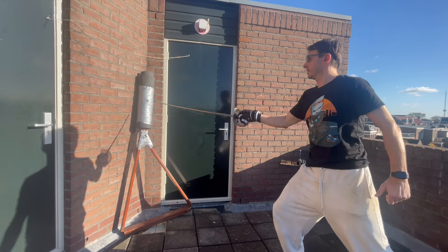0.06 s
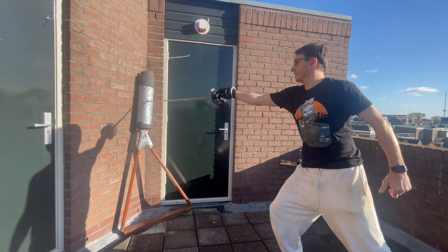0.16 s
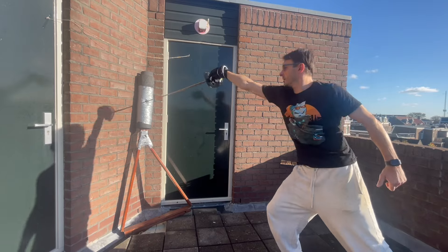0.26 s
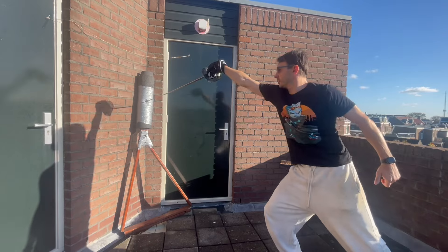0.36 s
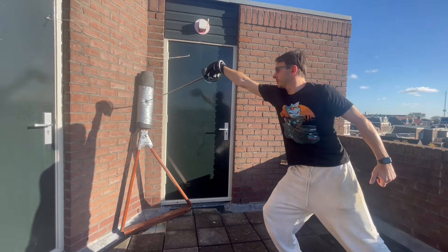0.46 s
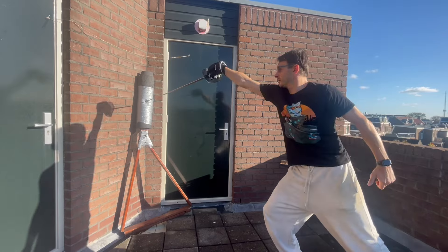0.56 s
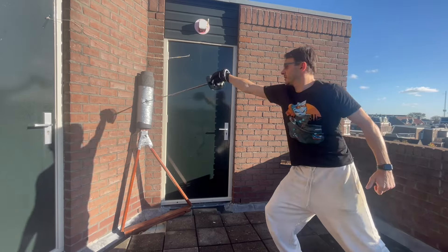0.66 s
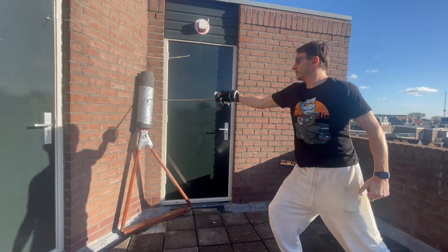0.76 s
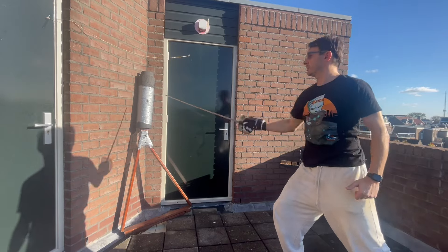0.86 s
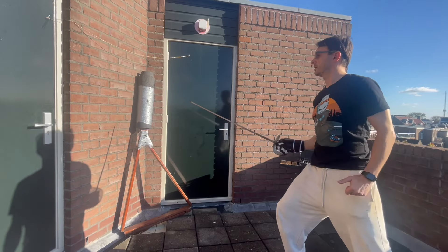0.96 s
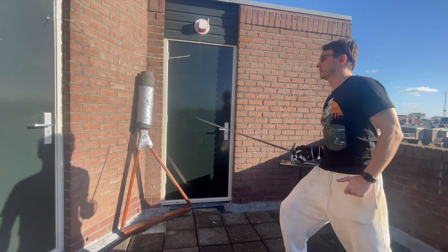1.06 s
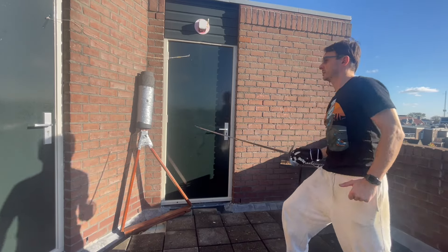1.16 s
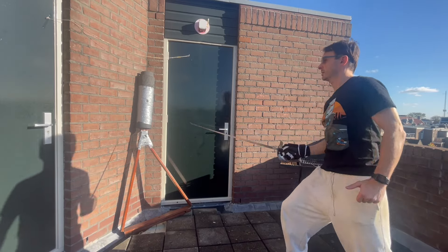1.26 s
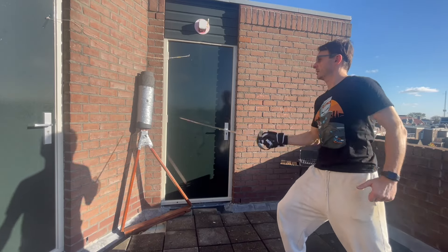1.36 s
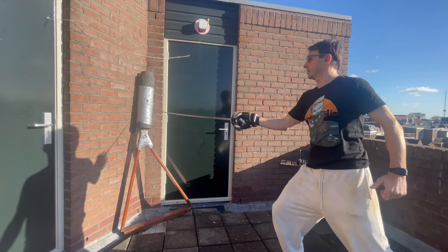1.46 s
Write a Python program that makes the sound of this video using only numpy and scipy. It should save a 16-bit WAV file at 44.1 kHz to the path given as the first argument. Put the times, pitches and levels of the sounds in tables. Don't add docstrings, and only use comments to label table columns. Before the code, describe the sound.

A single blade thrust hits a taped padded tube with a sharp crack, crunch and dull thud, its wooden stand rattling briefly; close stereo microphone on a brick roof terrace, low city hum, then a faint shoe scrape.

```python
import sys
import numpy as np
from scipy import signal
from scipy.fft import rfft, irfft, next_fast_len
from scipy.io import wavfile
from scipy.ndimage import uniform_filter1d, map_coordinates

SR = 44100
rng = np.random.default_rng(int(sys.argv[2]) if len(sys.argv) > 2 else 0)


def dump(signal):
    limited = np.clip(np.atleast_2d(signal).T, -1, 1)
    pcm = np.round(limited * 32767).astype(np.int16)
    wavfile.write(sys.argv[1], SR, pcm)


def rack_gain(trim_db):
    fader = np.asarray(trim_db, float)
    return 10 ** (fader / 20)


N = 66150


def unit(x):
    return x / np.sqrt(np.mean(x ** 2) + 1e-20)


def along(points, hz):
    f, value = np.transpose(points)
    return np.interp(np.log(hz + 1), np.log(f + 1), value)


def level(rows):
    s, db = np.transpose(rows)
    return rack_gain(np.interp(np.arange(N) / SR, s, db, left=-130, right=-130))


def burst(s, db, t60):
    t = np.arange(N) / SR
    return (t >= s) * rack_gain(db - 60 * np.clip(t - s, 0, 1) / t60)


def wobble(rate):
    knots = rng.standard_normal(int(N * rate / SR) + 4)
    return map_coordinates(knots, [np.arange(N) * rate / SR])


def filtered(x, response):
    m = next_fast_len(N + SR // 2)
    return irfft(rfft(x, m) * response(np.fft.rfftfreq(m, 1 / SR)), m)[..., :N]


def without_bass(x, low_hz):
    return filtered(x, lambda hz: (1j * hz / (low_hz + 1j * hz)) ** 2)


def coloured(x, spectrum):
    closed = [(spectrum[0][0] / 2, -70)] + list(spectrum) + [(spectrum[-1][0] * 2, -90)]
    return unit(filtered(x, lambda hz: rack_gain(along(closed, hz))))


# f/Hz, likeness [0..1]
PORT_LIKENESS = [(100, 0.93), (250, 0.51), (420, 0.27), (600, 0.88), (1100, 0.039), (8000, 0.033),
                 (9500, 0.55), (12500, 0.52)]


def far(spectrum):
    def shares(hz):
        turn = np.arccos(np.clip(along(PORT_LIKENESS, hz), 0, 1)) / 2
        return np.array([np.cos(turn), np.sin(turn)])

    mid, side = filtered(rng.standard_normal((2, N)), shares)
    return coloured(np.array([mid + side, mid - side]), spectrum)


def ring(events, modes, attack_s, scatter_db, turn):
    t, out = np.arange(N) / SR, np.zeros((2, N))
    hz, db, t60 = np.transpose(modes)[:, :, None]
    chance = rng.standard_normal((len(events), 2, 2, len(modes), 1))
    for (s, size_db), (luck, phase) in zip(events, chance):
        start = int(s * SR) + 1
        u = t[start:start + SR // 6] - s
        strength = rack_gain(size_db + db + scatter_db * luck - 60 * u / t60)
        tones = strength * np.sin(2 * np.pi * hz * u + turn * phase)
        out[:, start:start + len(u)] += tones.sum(1) * (1 - np.exp(-u / attack_s)) ** 2
    return out


# f/Hz, level/dB
RUMBLE = [(25, -18.5), (55, 2.5), (100, -5), (200, -11.5), (420, -19.5), (900, -19), (1700, -28),
          (3300, -49)]
# f/Hz, level/dB
HISS = [(2000, -1.5), (3800, 3.5), (5500, 0.5), (6500, -2), (8200, 5.5), (9900, -3), (12800, -23),
        (14800, -39)]


def city():
    rumble = rack_gain(-50 + .4 * wobble(3) + .4 * wobble(12)) * far(RUMBLE)
    return rumble + rack_gain(-83) * far(HISS)


# t/s, level/dB
HUM = [
    (0, -55.5),
    (.3, -52.5),
    (.42, -65),
    (.52, -51.5),
    (.8, -53.5),
    (1.05, -57),
    (1.19, -47),
    (1.5, -51.5),
]
# t/s, level/dB
DRONE = [
    (0, -65.5),
    (.15, -57.5),
    (.35, -59),
    (.41, -51),
    (.5, -61.5),
    (.9, -61.5),
    (1.1, -65.5),
    (1.25, -61.5),
    (1.5, -54.5),
]


def engines():
    def narrow(centre_hz, width_hz):
        noise = rng.standard_normal(N)
        return unit(filtered(noise, lambda hz: 1 / (1 + ((hz - centre_hz) / width_hz) ** 2)))

    return level(HUM) * narrow(95.5, 13) + level(DRONE) * narrow(202.8, 36.4)


# f/Hz, level/dB rms
FAN = [(274, -76.5), (362, -74.5), (580, -65.5), (7762.6, -117.5), (7946.5, -79), (8038.6, -79.5),
       (8130.3, -102), (8223, -107)]


def fan():
    t, out = np.arange(N) / SR, 0
    for hz, db in FAN:
        gain = rack_gain(db + 2 + 0.14 * wobble(4.4))
        out = out + gain * np.sin(2 * np.pi * (hz * t + rng.random()))
    return out


# t/s, level/dB
CLOTH = [(0, -77), (.1, -78), (.187, -71.5), (.191, -61), (.212, -60.5), (.225, -60), (.35, -79),
         (.45, -85.5), (.8, -81), (.86, -72), (.97, -73), (1.1, -78.5), (1.25, -91), (1.5, -76.5)]
# f/Hz, level/dB
FABRIC = [(4000, -26), (6000, -2.5), (9000, -4), (12500, 1), (14500, 0.5), (15600, 12)]


def clothes():
    return level(CLOTH) * unit(far(FABRIC) * rack_gain(2.0 * wobble(170)))


# t/s, level/dB, length/s, centre f/Hz
GRIT = [(0.05, -66.5, 0.017, 3460), (0.328, -70, 0.036, 12000), (0.592, -70.5, 0.1, 11600),
        (.707, -66, 0.0094, 6000), (0.7123, -61, 0.011, 9000), (.718, -65.5, 0.093, 5200),
        (0.764, -65, 0.045, 11000), (0.766, -72, .03, 6500), (0.783, -65, 0.015, 4500),
        (.8285, -78, 0.017, 1600), (.856, -68, .02, 12000), (.882, -68, .01, 4000),
        (0.8864, -57, .03, 1990), (0.905, -71, .015, 3000), (0.908, -68, 0.011, 3500),
        (0.966, -68, .012, 4000), (0.976, -63, 0.018, 3400), (0.987, -73, .015, 3000),
        (1.035, -67.5, 0.018, 3200)]


def grit():
    sand, out = far([(500, 0), (15000, 0)]), 0
    for s, db, t60, centre_hz in GRIT:
        bell = lambda hz: np.exp(-.5 * (np.log2((hz + 1) / centre_hz) / .6) ** 2)
        out = out + burst(s, db, t60) * unit(filtered(sand, bell))
    return out


# t/s, level/dB
SWISH = [
    (.08, -83),
    (.14, -81),
    (.155, -75.5),
    (.195, -69),
    (.21, -88),
]
# f/Hz, level/dB
AIR = [(2400, -14), (3000, -5), (3450, 0), (4000, -12)]


def blade():
    return level(SWISH) * far(AIR)


# t/s, level/dB
CRUNCH = [
    (.18, -57.5),
    (.2, -48.5),
    (.204, -42),
    (.228, -38),
    (.233, -34.5),
    (.25, -36),
    (.28, -62),
    (.35, -62.5),
]
# f/Hz, level/dB
TAPE = [(300, 3.5), (1000, 0.5), (2200, -1.5), (3600, -13.5), (5500, -25), (9000, -29), (12500, -59),
        (14500, -47)]
# t/s, level/dB
KNOCKS = [(.2032, -35), (.2105, -31.5), (.2172, -35), (.2299, -24), (0.2313, -14.5), (.234, -19),
          (.2375, -34.5), (.247, -40), (.253, -30.5), (.2625, -28.5), (.269, -46), (.279, -37),
          (.29, -45.5), (.301, -58)]


def crunch():
    effort = level(CRUNCH) + sum(burst(s, db - 14, .015) for s, db in KNOCKS)
    effort = np.abs(uniform_filter1d(effort, size=60))
    noise = rng.standard_normal(N) + 0.26 * rng.standard_normal((2, N))
    return effort * coloured(noise * rack_gain(0.98 * wobble(405.2)), TAPE)


# f/Hz, level/dB, t60/s
CLACK = [(749, -2, 0.017), (1000, -4, 0.022), (1200, -18, 0.0057), (1920, -10, 0.024), (2860, -18.5, 0.024),
         (3200, -24, 0.012), (3700, -13.5, 0.012), (4870, -32, 0.018), (6060, -44, 0.011)]
# f/Hz, level/dB, t60/s
STAND = [(818, -4.5, 0.21), (1025, 2, 0.078), (1177, -2, 0.14), (1336, -0.5, 0.18), (1552, -2.5, 0.15),
         (1766, -9, 0.3), (1961, 3, 0.17), (2127, 3, 0.11), (2240, -8, 0.078), (2460, -5, 0.17),
         (3200, -16, 0.065), (3600, -26, 0.12)]


def knocks():
    clack = ring(KNOCKS, CLACK, attack_s=.00025, scatter_db=2, turn=.3)
    damped = np.array(STAND) * [1, 1, .5]
    return clack + rack_gain(-17) * ring(KNOCKS, damped, attack_s=0.00042, scatter_db=4.0, turn=0.43)


# t/s, level/dB
SLAPS = [
    (.2041, -23.5),
    (.2093, -31),
    (.2298, -24),
    (.2332, -22),
    (.2570, -30),
    (.2625, -33),
    (.312, -42),
]
# f/Hz, level/dB, t60/s
SKIN = [(310, -9, .04), (387, 0, .05), (490, -8, .022), (595, 1, .03)]


def slaps():
    return ring(SLAPS, SKIN, attack_s=.0005, scatter_db=1.5, turn=.3)


# t/s, level/dB
THUDS = [(.2068, -21.5), (.2115, -28), (.2215, -31), (.2265, -26), (.2315, -26), (.2363, -37), (.2437, -22),
         (.2479, -23.5), (.2583, -28), (.2683, -40), (.2803, -36), (.2849, -36), (.2898, -35), (.2998, -40)]
# f/Hz, level/dB, t60/s
PAD = [(201, 0, .072), (250, -12, .05), (330, -14, .035), (400, -14, .035)]


def thuds():
    thud = ring(THUDS, PAD, attack_s=.0005, scatter_db=1.5, turn=.3) * rack_gain([[1.3], [-1.3]])
    return without_bass(thud, 120)


# t/s, level/dB
SKIPS = [
    (.2105, -36),
    (.2172, -29),
    (.2225, -34),
    (.2297, -24.5),
    (.2385, -19),
]
# f/Hz, level/dB, t60/s
TIP = [(2149, 0, 0.019), (3400, -11.5, 0.013)]


def skips():
    return ring(SKIPS, TIP, attack_s=0.00028, scatter_db=1.5, turn=0.32)


# t/s, level/dB
CHATTER = [
    (.2185, -30),
    (.2326, -21),
    (.23484, -13),
    (.23708, -14.5),
    (.2445, -29),
    (.2525, -29),
]
# f/Hz, level/dB, t60/s
CORE = [(1050, -11, .012), (1350, 0, .014)]


def chatter():
    return ring(CHATTER, CORE, attack_s=.0004, scatter_db=1.2, turn=.25)


# t/s, level/dB
JOLTS = [
    (.2362, -24),
    (.2370, -18),
    (.2394, -20),
    (.2402, -22),
    (.2602, -33),
]
# f/Hz, level/dB, t60/s
LEG = [(1240, 0, .022), (740, -9, .015)]


def jolts():
    return ring(JOLTS, LEG, attack_s=.0005, scatter_db=1, turn=.2) * rack_gain([[0], [-9]])


# f/Hz, t60/s
WALLS = [(200, 0.34), (1200, 0.15), (4000, 0.11), (12000, 0.18)]


def walls(x):
    hz, t, z = signal.stft(rng.standard_normal((2, SR // 3)), SR, nperseg=256)
    decay = rack_gain(-60 * t / along(WALLS, hz)[:, None])
    tail = signal.istft(z * decay, SR, nperseg=256)[1]
    tail = tail / np.linalg.norm(tail[0])
    thin = without_bass(x.mean(0), 400)
    late = np.pad(thin, (130, 0))[None]
    return signal.fftconvolve(late, tail, axes=1)[:, :N]


# t/s, level/dB
DRAG = [
    (.69, -100),
    (.715, -72.5),
    (.75, -70),
    (.8, -72),
    (.88, -70),
    (.97, -65.5),
    (1.05, -68.5),
    (1.16, -81),
    (1.5, -79),
]
# f/Hz, level/dB
SOLE = [(800, -11), (1800, 4.5), (3300, -3), (4600, -8.5), (5600, -19), (7000, -10.5), (10000, -20.5),
        (12500, -9)]


def shoe():
    return level(DRAG) * unit(far(SOLE) * rack_gain(1.8 * wobble(350) + .6 * wobble(40)))


def bird():
    t = np.arange(N) / SR
    swell = np.exp(-.5 * ((t - 1.2) / 0.011) ** 2)
    return rack_gain(-79) * swell * np.sin(2 * np.pi * 4300 * t)


def scene():
    background = city() + engines() + fan() + bird()
    hit = crunch() + knocks() + slaps() + thuds() + skips() + chatter() + jolts()
    return background + clothes() + blade() + hit + rack_gain(-6.5) * walls(hit) + grit() + shoe()


def top_cut(x):
    return signal.sosfilt(signal.butter(12, 15610, fs=SR, output="sos"), x)


# f/Hz, level/dB
TILT = [(100, -2.5), (400, -3.5), (800, 3), (2200, 0.5), (3000, 3.5), (8000, 8.5), (9500, 0.5)]
# f/Hz, lead/rad
LEAD = [(330, 0), (520, 1.8), (900, 2.3), (1500, 2.4), (2200, 3.1), (4500, 5.2), (9300, 9.4),
        (12300, 2 * np.pi)]


def record(dry):
    half = np.array([[.5], [-.5]])

    def ports(hz):
        gain = rack_gain(half * along(TILT, hz)) * np.exp(1j * half * along(LEAD, hz))
        return gain * (hz < 15650) / (1 + (hz / 14400) ** 20)

    left, right = filtered(dry, ports)
    mid = (left + right) / 2
    side = filtered((left - right) / 2, lambda hz: 1 / (1 + (hz / 12800) ** 20))
    return top_cut(np.array([mid + side, mid - side]))


dry = scene()
out = record(dry)
dump(out)
```